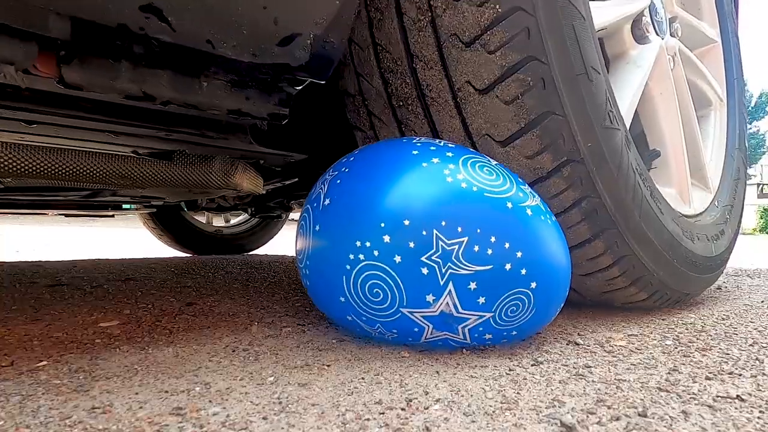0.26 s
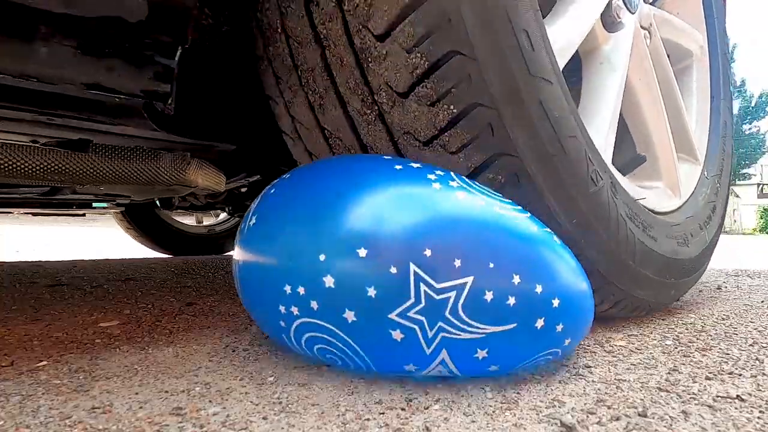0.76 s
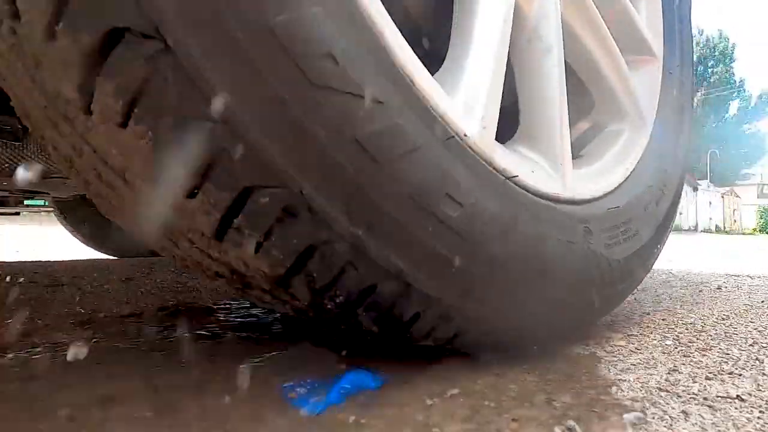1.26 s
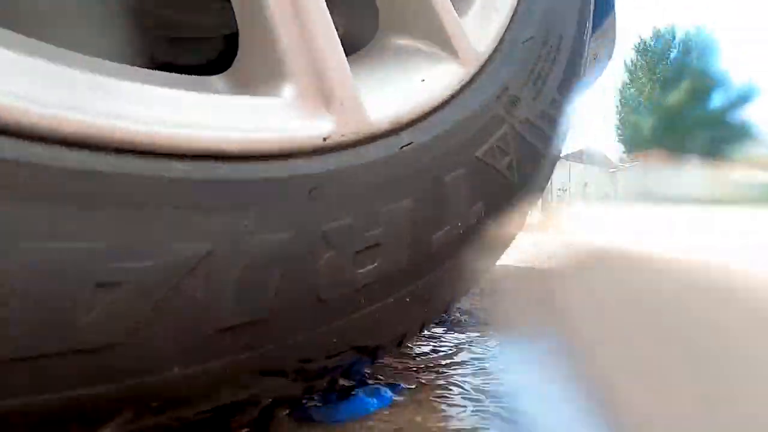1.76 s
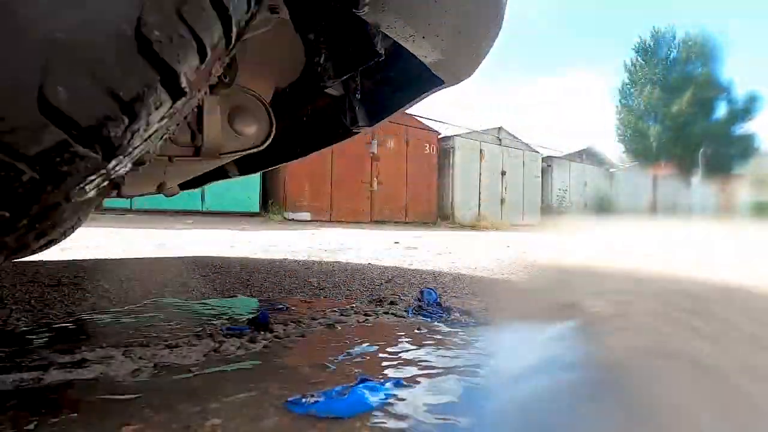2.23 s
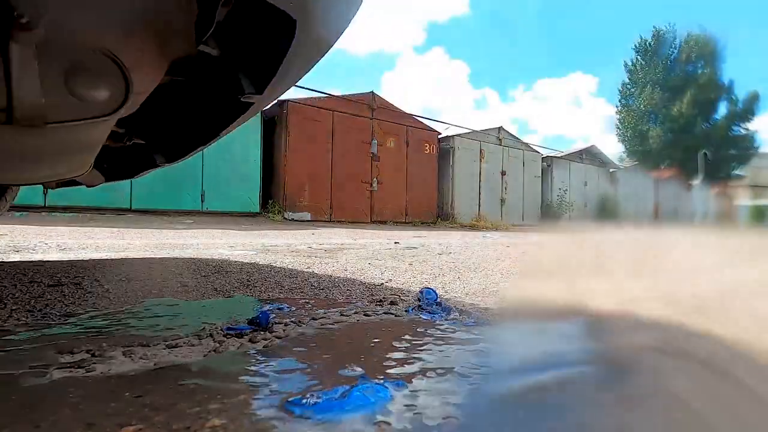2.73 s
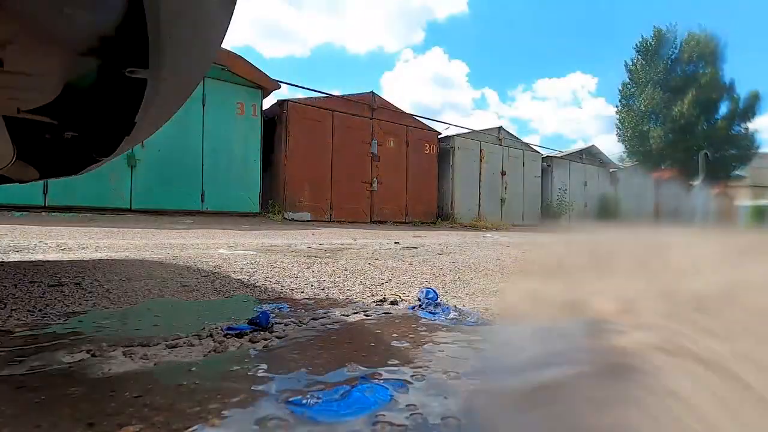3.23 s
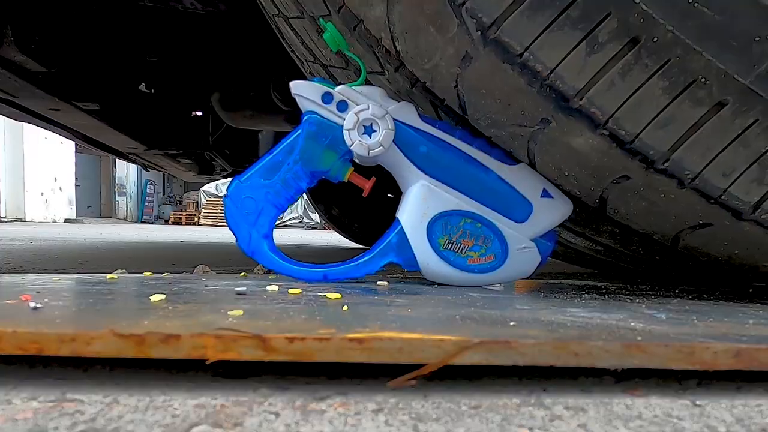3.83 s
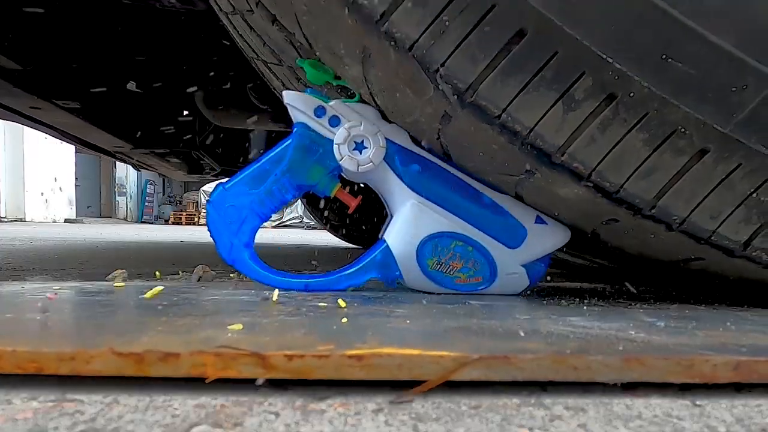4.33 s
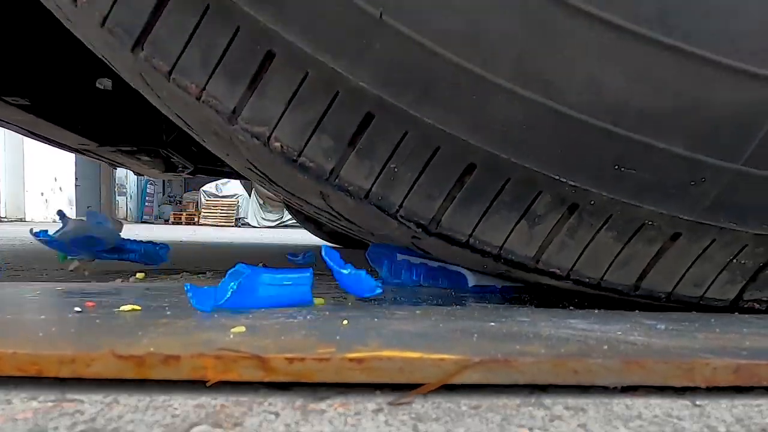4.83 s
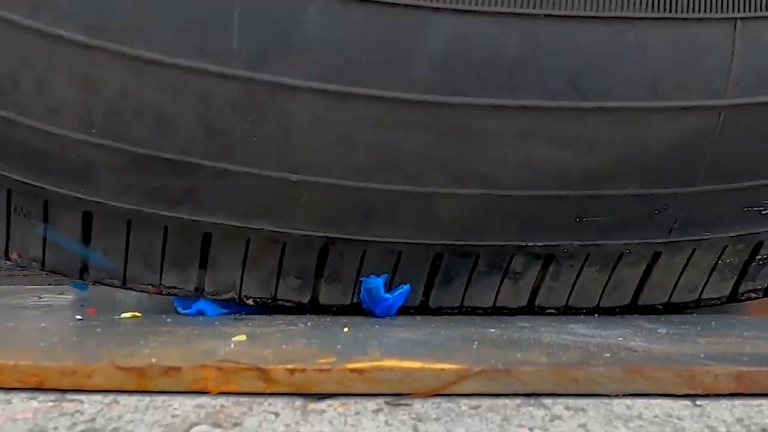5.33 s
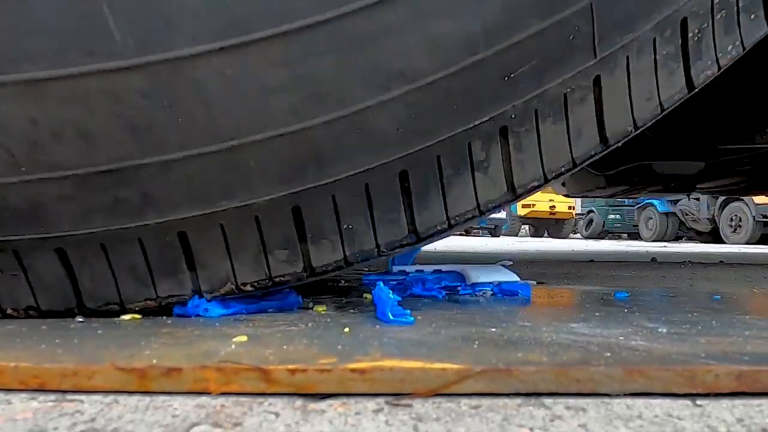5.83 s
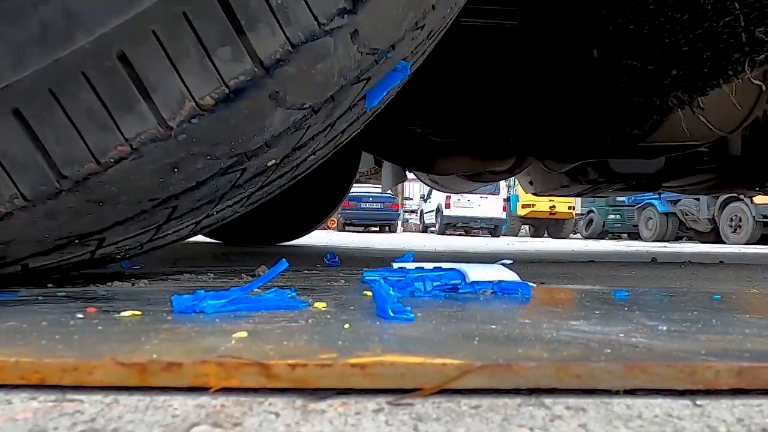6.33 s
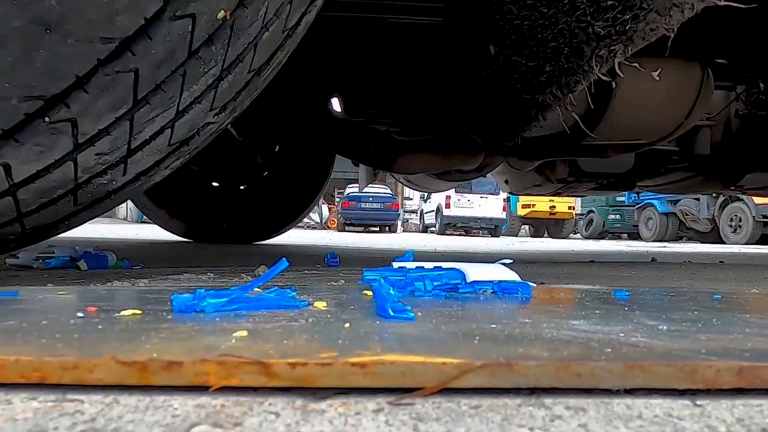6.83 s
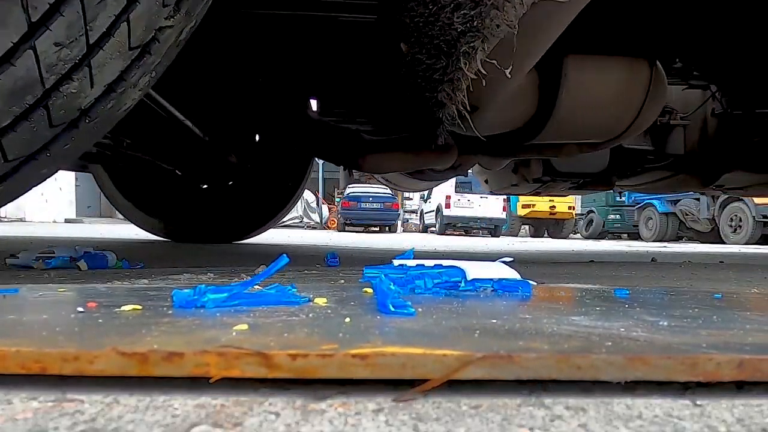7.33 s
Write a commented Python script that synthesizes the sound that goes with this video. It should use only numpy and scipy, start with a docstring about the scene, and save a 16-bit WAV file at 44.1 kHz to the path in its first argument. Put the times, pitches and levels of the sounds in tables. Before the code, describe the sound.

From 0 s a petrol engine idles very close, a low pulsing drone with airy whirr. Around 0.65 s a couple of small wet ticks and a thin trickle begin; at about 1.1 s the water balloon bursts in a gush, a bubbly gulp and hard slaps straight on the microphone. The engine turns quiet and muffled, with another watery thump near 1.48 s, then scattered drops and faint wet tyre ticking. The exhaust swells back from 2.3 to 2.8 s. At 3.57 s a hard cut: a rough diesel clatters, with light ringing chinks. From 4.25 s plastic cracks sharply and densely, with squeaky creaks, hollow ringing and crunching splinters while the engine sags. After 5 s the breaks grow duller and sparser, stopping near 5.55 s. Diesel clatter returns from 5.7 s; a last cluster of cracks comes at 5.96-6.15 s, a grit tick at 6.4 s, then rattling idle with small chinks until 7.6 s.

```python
"""A petrol car idles close beside a ground-level microphone, its exhaust harmonics locked to the firings.
The creeping wheel bursts a water balloon: coloured spray, bubble tones and slaps hit the microphone.
Dulled engine noise and drops follow, then a hard cut to a clattering diesel, noise puffed by each firing.
It rolls over a plastic water pistol: bursts of noise and ringing tones crack it and its hollow body rings,
while splinters crunch, gliding tones creak, and short echoes under the car hollow the sound."""
import sys
import numpy as np
from scipy import signal
from scipy.fft import rfft, irfft, next_fast_len
from scipy.io import wavfile

SR = 44100
rng = np.random.default_rng(int(sys.argv[2]) if len(sys.argv) > 2 else 0)


def unload_wav(signal):
    """Save mono or channel-first audio to the path in sys.argv[1] as 16-bit WAV at rate SR, clipped to [-1, 1]."""
    wavfile.write(
        sys.argv[1],
        SR,
        np.round(np.clip(np.atleast_2d(signal).T, -1, 1) * 32767).astype(np.int16),
    )


N = 334278

CUT_S, EDGE_HZ = 3.567, 15900  # cut between the scenes; upper band limit
T = np.arange(N) / SR

# Petrol engine speed: time_s, firings_per_s
PETROL_SPEED = [(0.0, 29.19), (0.95, 29.6), (1.7, 29.0), (2.3, 29.03), (2.6, 28.77), (2.85, 29.14),
                (3.05, 28.72), (3.3, 28.41), (3.565, 29.48)]
# Exhaust harmonics beside the car and behind it: multiple_of_firing_rate, relative_level_db
PIPE_BESIDE = [(1, 1.5), (2, -4), (3, -3), (4, -18), (5, -10.5), (6, -10), (7, -11), (8, -2), (9, -18.5),
               (10, -21)]
PIPE_BEHIND = [(1, 1), (2, -5.5), (3, -8.5), (4, -23), (5, -16.5), (6, -18), (7, -11.5), (8, -13.5),
               (9, -25.5), (10, -20), (11, -31.5), (12, -27), (13, -23.5), (14, -36.5), (15, -30),
               (16, -33), (17, -26.5), (18, -35)]
# Engine-bay whirr through a dry and a wet microphone: frequency_hz, relative_level_db (per Hz)
WHIRR_DRY = [(20, -2), (100, 8.5), (250, 7.5), (350, -4), (700, -9), (1500, -4.5), (2300, -9), (4000, -14),
             (7000, -21.5), (10000, -34), (16000, -53)]
WHIRR_WET = [(20, 14), (100, 13), (250, 9.5), (480, 4), (650, -0.5), (1000, 1.5), (1500, -5), (2100, -15),
             (3500, -26.5), (6000, -46), (9000, -63.5), (16000, -56)]
# Resonances of the engine bay: frequency_hz, width_hz, lift_db (dry; a share of it when wet)
BAY = [(495, 100, 5), (948, 73, 11.5), (1398, 37, 7), (1676, 36, 7), (2230, 89, 6.5)]
# Petrol level, down once the microphone is wet and up as the tailpipe comes round: time_s, level_db
PETROL_LEVEL = [(0.0, 0), (1.14, 0.5), (1.17, -2), (1.45, -11), (1.75, -12), (2.15, -13.5), (2.8, -2),
                (3.55, 1)]
# Low and high exhaust harmonics, before the level curve and the slight lean to the right
BOOM_DB, DRONE_DRY_DB, DRONE_WET_DB = -26, -32.5, -37.5
DRONE_UNEVEN_DB = 2.5  # plus or minus, from firing to firing once the microphone is wet
DRONE_DROP_S, DRONE_DROP_DB = 0.64, -2.5  # the drone eases as the balloon gives way
# Whirr levels before the level curve, and the share of that curve's dB it follows
WHIRR_DRY_DB, WHIRR_WET_DB, WHIRR_FOLLOWS = -40, -43.5, 0.57
# Each wave smothers the engine for a moment
SMOTHER_DB, SMOTHER_FALL_S, SMOTHER_HOLD_S, SMOTHER_RECOVER_S = -16.5, 0.019, 0.064, 0.17

# Diesel engine speed: time_s, firings_per_s
DIESEL_SPEED = [(3.58, 31.53), (3.9, 34.13), (4.19, 33.66), (4.37, 33.01), (4.93, 29.95), (5.2, 28.31),
                (5.5, 26.92), (5.88, 31.82), (6.33, 28.33), (6.45, 27.24), (6.7, 28.09), (7.58, 27.22)]
# Exhaust harmonics pulling and idling: multiple_of_firing_rate, relative_level_db
PIPE_PULL = [(1, 1), (2, 4), (3, -5.5), (4, -10), (5, -24.5), (6, -19), (7, -12)]
PIPE_IDLE = [(1, -1), (2, 6.5), (3, 0), (4, 0), (5, -7), (6, -29), (7, -9.5), (8, -14.5), (9, -12.5)]
# Clatter ahead of the wheel and under the body: frequency_hz, relative_level_db (per Hz)
CLATTER_AHEAD = [(20, 2.5), (110, 8), (250, 0.5), (550, -1.5), (1100, 0.5), (1500, -5.5), (2100, -6.5),
                 (2500, -12), (3500, -14), (4200, -25), (6500, -33.5), (8500, -42), (12000, -51.5),
                 (16000, -62)]
CLATTER_UNDER = [(20, -10), (110, 8.5), (250, 5), (550, 3), (1000, 1.5), (1500, -1.5), (2100, -5.5),
                 (2600, -9), (3400, -10), (4200, -23), (6500, -34), (8500, -43.5), (12000, -50),
                 (16000, -58)]
# Resonances of the engine block: frequency_hz, width_hz, lift_db
BLOCK = [(940, 78, 0), (1890, 110, 1), (3480, 140, 2), (5380, 1140, 8.5), (7400, 710, 8.5),
         (9450, 800, 7.5)]
# Clatter level before trims, lowest while the tyre stands before the microphone: time_s, level_db
DIESEL_LEVEL = [(3.6, -31.5), (4.2, -31.5), (4.36, -42), (4.8, -50.5), (5.25, -50), (5.57, -52),
                (5.69, -38.5), (6.2, -40.5), (6.5, -36.5), (7.55, -35)]
# Exhaust levels before the clatter curve, and the share of that curve's dB they follow
PULL_DB, IDLE_DB, PIPE_FOLLOWS = -12, -10, 0.58
LIMP_DB = 2.5  # alternate firings: their spread in the idle clatter, plus or minus in the rattle
# Loose underbody parts that buzz with the firings: frequency_hz, width_hz, level_db (before clatter curve)
RATTLES = [(1110, 540, -7), (2016, 420, -12.5), (3435, 220, -21)]
# Loose parts left ringing: start_s, level_db, pitch_hz
CHINKS = [(3.612, -23, 1974), (3.706, -28, 3540), (3.793, -23, 2000), (3.889, -31, 3640),
          (3.971, -24, 2000), (4.063, -29, 3650), (4.149, -23, 1980), (6.641, -29, 3410), (6.78, -35, 3420),
          (6.855, -27.5, 3380), (6.926, -41, 3480), (7.07, -33, 3520), (7.288, -33, 3450),
          (7.365, -33, 3450), (7.40, -33, 3430), (7.437, -45, 3420), (7.51, -29.5, 3450)]
CHINK_RISE_S, CHINK_RING_S = 0.0046, 0.049  # rise and t60
# Echoes between the ground and the floor of the car: delay_s, level_db
ECHOES = [(.0023, -25), (.0041, -20), (.0067, -19), (.0098, -16), (0.0147, -17.5)]

# Tyre rumble: frequency_hz, relative_level_db (per Hz)
RUMBLE_COLOUR = [(15, -26), (38, 4), (130, 0.5), (200, -5.5), (320, -15.5), (600, -20.5), (1200, -28),
                 (4000, -71)]
# Splinters under the tread: frequency_hz, relative_level_db (per Hz)
CRUNCH_COLOUR = [(590, -41), (1000, 9), (1740, 1), (1950, -2), (3210, 2.5), (4260, -2), (4720, 2),
                 (6410, -3.5), (9210, -5.5), (15000, -25)]
# How hard the tyre grinds the splinters: time_s, crunch_level_db
GRINDING = [(4.22, -44.5), (4.4, -49), (4.75, -46), (4.95, -45), (5.13, -49.5), (5.27, -53), (5.32, -58),
            (5.4, -51.5), (5.53, -52.5), (5.57, -62), (5.62, -69), (5.92, -58), (6.01, -45), (6.07, -53),
            (6.12, -52), (6.2, -62)]
RUMBLE_DB, RUMBLE_FOLLOWS = -17.5, 0.36  # level before, and share of, the grinding curve's dB
# The engine and tyre sound sinks briefly after a crack, by a share of its thud_db above a threshold
DIP_ABOVE_DB, DIP_SHARE, DIP_FALL_S, DIP_HOLD_S, DIP_RECOVER_S = -34.5, 0.28, 0.025, 0.017, 0.059

# Rushing water: frequency_hz, relative_level_db (per Hz)
RUSH_COLOUR = [(240, -30), (400, -6), (780, -9), (949, -2.5), (1390, -5), (3830, -9), (7240, -20.5),
               (9810, -20.5), (15000, -38)]
# Water running out in gushes: start_s, end_s, first_level_db, last_level_db
GUSHES = [(0.62, 1.12, -45.5, -42), (0.88, 1.11, -53, -30), (1.111, 1.121, -32, -28.5),
          (1.1386, 1.138, -22, -28), (1.17, 1.474, -73.5, -48.5)]
GUSH_RELEASE_DB_PER_S = 1097  # fall after the end of a gush
# Waves over the microphone: start_s, end_s, level_db, bubble_hz, bubble_level_db (before its left lean)
WAVES = [(1.101, 1.147, -20, 930, -17), (1.456, 1.487, -31.5, 900, -21)]
SETTLE_DB, SETTLE_S = -19.5, 0.31  # low tail of a wave: level relative to the wave, t60
SLOSH_DB, SLOSH_S = -7, 0.048  # dull slosh after a wave: level relative to the wave, t60
# Water slapping the microphone: start_s, level_db, pitch_hz, t60_s, left_minus_right_db
SLAPS = [(1.1420, -2, 586, 0.0088, 5.5), (1.1435, -13.5, 360, 0.011, -2), (1.148, -26, 200, 0.03, 2),
         (1.274, -46, 1550, 0.024, 0), (1.284, -43, 1360, .022, 0), (1.4620, -27.5, 140, 0.081, -20),
         (1.4772, -23.5, 139, 0.036, -17), (1.4827, -21, 136, 0.061, 17), (1.482, -6.5, 650, 0.008, -12.5),
         (1.4832, -11, 1520, 0.0059, 11.5), (1.648, -40.5, 550, 0.01, -2), (1.781, -27, 850, 0.016, -4.5),
         (1.784, -29.5, 595, 0.023, -1), (3.520, -24.5, 1043, 0.01, -0.5)]
# Drops landing: start_s, level_db, pitch_hz, blip_db (relative to level_db)
DROPS = [(0.6625, -26.5, 3230, -1), (0.698, -25, 900, -12), (1.144, -18.5, 2300, -20),
         (1.284, -46, 1400, -8), (1.335, -37, 1520, -20), (1.352, -36.5, 2800, -9), (1.403, -39, 2160, -6),
         (1.4309, -27, 1890, -17), (1.471, -30, 1620, 0), (1.481, -26, 1650, -19), (1.648, -59, 2300, -7),
         (1.781, -46, 3930, -17), (1.799, -47, 4500, -11), (2.0084, -46, 3170, -5), (2.019, -45, 2400, -6),
         (2.0285, -46, 3080, -13), (2.038, -58, 4000, -6), (2.154, -49.5, 3250, -2.5),
         (2.232, -54, 2500, -5), (2.43, -59, 2500, -10), (2.65, -56, 2500, -10), (2.757, -54, 2580, -5),
         (2.819, -44, 1880, -5), (3.332, -50, 2300, -10)]
# Stray drips from the wet tyre as it rolls away
DRIPS_FROM_S, DRIPS_TO_S, DRIP_DB, DRIP_SPREAD_DB = 1.6, 3.5, -65, 3
DRIP_LOW_HZ, DRIP_HIGH_HZ = 1700, 3600

# Creaks and squeaks, with the pistol's hollow shell singing near 1.8 kHz:
# start_s, end_s, start_pitch_hz, end_pitch_hz, level_db
CREAKS = [(4.203, 4.238, 1160, 1130, -41), (4.274, 4.33, 1795, 1750, -52), (4.416, 4.438, 1165, 1085, -38),
          (4.466, 4.508, 1680, 1760, -41.5), (4.562, 4.594, 1030, 920, -42.5),
          (4.568, 4.62, 1805, 1765, -43), (4.646, 4.671, 1480, 1753, -39), (4.675, 4.712, 1790, 1770, -49),
          (4.699, 4.744, 1805, 1810, -39.5), (4.701, 4.717, 4480, 4890, -40),
          (4.737, 4.763, 4000, 4900, -41), (4.777, 4.805, 1455, 1380, -44), (5.205, 5.272, 4130, 4480, -48),
          (5.273, 5.29, 4460, 4530, -39), (5.388, 5.402, 1250, 1350, -54), (5.431, 5.44, 1260, 1360, -46),
          (5.53, 5.544, 268, 219, -35)]
CREAK_BEND, CREAK_BENDS_PER_S = 0.0084, 60  # rms pitch ratio; it bends as the load shifts
CREAK_UNEVEN_DB, CREAK_PURE = 5.5, .55  # catching and letting go; share of steady squeal
# Plastic cracking: start_s, level_db, pitch_hz, thud_db (raised 4 dB later), snap_db, tear_t60_s
CRACKS = [(4.2456, -16, 3080, -23, -24, 0.012), (4.259, -25, 4070, -43, -36, 0.012),
          (4.288, -19, 2760, -29, -31, 0.016), (4.3025, -19, 3500, -26.5, -26.5, 0.014),
          (4.341, -20.5, 2590, -22, -28, 0.022), (4.3533, -27, 2800, -38, -44, 0.015),
          (4.389, -26, 3440, -33, -42, 0.013), (4.394, -19, 2500, -31, -31, 0.019),
          (4.405, -31, 2870, -49, -42, 0.013), (4.432, -23, 2850, -39, -31, 0.024),
          (4.4533, -24, 2580, -29.5, -31.5, 0.041), (4.4765, -26, 4730, -36, -43, 0.035),
          (4.498, -23, 1650, -29, -27.5, 0.025), (4.5033, -18.5, 2930, -31, -31, 0.019),
          (4.5326, -22, 2620, -26.5, -25, 0.02), (4.5365, -24, 1760, -34, -34, 0.026),
          (4.5836, -36, 4500, -30, -39, .02), (4.595, -20.5, 4010, -38, -28, 0.023),
          (4.6199, -38, 2700, -49, -31, 0.017), (4.6487, -27, 1820, -42, -39, .024),
          (4.6612, -22, 1690, -38, -27.5, 0.022), (4.6808, -26, 1810, -35, -35, 0.027),
          (4.7062, -24, 4600, -32.5, -38, 0.037), (4.7116, -23.5, 3300, -40, -34, 0.023),
          (4.743, -28, 3940, -38, -36, 0.029), (4.755, -25.5, 4630, -38, -39, 0.074),
          (4.764, -34, 2720, -52, -38, 0.02), (4.783, -25.5, 3000, -37, -26.5, 0.039),
          (4.794, -21, 3200, -30.5, -29, 0.021), (4.8, -27.5, 3160, -50, -32, 0.078),
          (4.86, -27, 3820, -50, -34, 0.012), (4.8703, -31, 2900, -45, -42, 0.012),
          (4.881, -26.5, 3080, -42, -31, 0.029), (4.901, -23, 3100, -34, -27.5, 0.018),
          (4.911, -25, 2440, -35, -32, 0.024), (4.9474, -20.5, 3000, -33, -31, 0.016),
          (4.9626, -25, 2370, -31.5, -29, 0.018), (4.996, -26, 3540, -30, -34, .009),
          (5.006, -25, 2200, -33, -26, 0.018), (5.041, -37, 3020, -41, -42, 0.0091),
          (5.0572, -22, 3700, -35, -30, 0.021), (5.0754, -27.5, 1620, -40, -36, 0.02),
          (5.0948, -24, 4410, -31.5, -32, 0.021), (5.11, -22, 3000, -36, -42, 0.021),
          (5.1182, -13, 2060, -23.5, -30, 0.008), (5.136, -40, 3380, -48, -55, .012),
          (5.1465, -37, 3800, -50, -50, .006), (5.1583, -24.5, 3330, -27.5, -46, 0.02),
          (5.189, -27, 3870, -40, -48, 0.011), (5.2005, -24.5, 4000, -28, -45, 0.0075),
          (5.22, -34, 3900, -50, -54, .012), (5.2282, -26, 3570, -45, -50, 0.018),
          (5.2427, -34, 4100, -44, -48, .009), (5.252, -31, 2500, -48, -52, .008),
          (5.2655, -27, 3570, -43, -50, 0.015), (5.256, -26, 3930, -38, -47, 0.0085),
          (5.2806, -28, 3780, -32, -46, 0.0043), (5.2842, -15.5, 3250, -20, -40, 0.011),
          (5.3267, -32, 2350, -42, -51, 0.0054), (5.3594, -19.5, 4570, -35, -31, 0.01),
          (5.3664, -28, 3910, -39, -33, 0.0086), (5.3935, -41, 1630, -31, -42, 0.011),
          (5.4117, -31, 5570, -50, -44, .006), (5.431, -19.5, 5760, -38, -38, 0.0066),
          (5.435, -23, 5640, -35, -40, 0.0061), (5.4706, -17.5, 3090, -35.5, -24.5, 0.0096),
          (5.4953, -22, 3020, -38, -25, 0.0068), (5.533, -16.5, 2370, -26, -29, 0.0067),
          (5.5436, -18.5, 2430, -33, -37, 0.0055), (5.963, -33, 2670, -36, -35, .02),
          (5.979, -24, 2970, -33, -35, 0.015), (6.0005, -19, 3670, -30, -43, 0.011),
          (6.029, -23.5, 1930, -27, -46, 0.028), (6.0976, -31, 3440, -32, -49, .024),
          (6.1136, -22.5, 3770, -28.5, -44, 0.012), (6.1535, -16, 2050, -25, -53, 0.0075)]
# Small pieces break at random between the big cracks; thud and snap are relative to the chip
CHIPS_FROM_S, CHIPS_TO_S, CHIP_DB, CHIP_SPREAD_DB = 4.45, 5.13, -31, 2
CHIP_LOW_HZ, CHIP_HIGH_HZ, CHIP_THUD_DB, CHIP_SNAP_DB, CHIP_TEAR_S = 1900, 4680, -18, -24, 0.032
SHELL_DB, SHELL_RING_S = -27, 0.041  # partials of each broken piece: level relative to the crack, t60
STRAIN_DB, STRAIN_S = -18.5, 0.028  # tiny fractures before a break: level relative to the crack, t60
# Hollow body of the pistol set ringing by the cracks: pitch_hz, level_db, t60_s
BODY = [(1124, -48, 0.17), (1746, -49, 0.18), (2720, -72, 0.07), (4570, -71, 0.046)]
# The tread closes over the pieces: they break duller and with less ring
COVER_S, COVER_FADE_S = 4.97, 0.19
# Loose pieces ringing as they spring free: start_s, level_db, pitch_hz, t60_s
SHARDS = [(4.2471, -19, 1085, 0.044), (4.247, -32, 1770, 0.17), (4.393, -27, 1104, 0.043),
          (4.5366, -33.5, 1800, .14), (5.2, -34, 4270, 0.037), (5.963, -32, 2620, 0.048),
          (5.963, -32.5, 4750, 0.033), (5.978, -33, 2630, 0.058), (6.001, -32, 3460, 0.046),
          (6.001, -31, 5400, 0.032), (6.017, -38, 3420, 0.074)]
# Grit ticking in the tread: start_s, level_db, pitch_hz
GRIT = [(5.773, -33, 4200), (5.885, -28.5, 4430), (6.017, -26, 5000), (6.059, -28.5, 5130),
        (6.105, -36, 5200), (6.137, -34, 5200), (6.394, -21.5, 2810), (6.741, -30, 9200),
        (6.764, -31, 8800)]

# Likeness of the left and right channels: frequency_hz, likeness (0-1)
SAME_PETROL = [(100, 0.9), (260, 1), (600, 0.75), (2000, 0.37), (5000, 0.14), (12000, 0.06)]
SAME_RUMBLE = [(40, 1), (800, 1)]
SAME_WET = [(100, 1), (1000, 1), (3000, 1), (9000, 0.64)]
SAME_DIESEL = [(100, 1), (2000, 1), (3500, .995), (6000, 0.95), (12000, 0.87)]
# Added left-right difference over time: time_s, side_level_db
WIDTH = [(1.0, -33), (1.2, -14), (1.42, -6.5), (1.55, -2), (1.8, -4), (2.05, -39), (2.4, -60),
         (3.55, -58.5), (3.58, -13.5), (4.15, -13.5), (4.27, -7), (4.55, -14), (4.8, -25.5), (5.1, -30),
         (5.3, -60)]
WIDTH_BASS_DB, WIDTH_BASS_HZ = -4, 400  # the bass is narrower


def amp(db):
    """Decibels to gain."""
    return 10 ** (np.asarray(db) / 20)


def evened(x):
    """Scales to rms 1."""
    return x / np.sqrt(np.mean(x ** 2) + 1e-20)


def read(points, hz):
    """Reads a spectrum table on a log-frequency axis."""
    f, value = np.transpose(points)
    return np.interp(np.log(hz + 1), np.log(f + 1), value)


def curves(rows):
    """Reads each column of a time table at every sample."""
    s, *columns = np.transpose(rows)
    return [np.interp(T, s, c) for c in columns]


def after(s, fade):
    """Rises from 0 to 1 around time s."""
    return np.clip((T - s) / fade + .5, 0, 1)


def dip(s, fall, hold, recover):
    """Goes from 0 to 1 after time s, stays, and returns."""
    return np.clip(np.minimum((T - s) / fall, 1 - (T - s - fall - hold) / recover), 0, 1)


def add(mix, s, sound):
    """Adds a sound to the mix at time s."""
    part = mix[:, round(s * SR):][:, :sound.shape[-1]]
    part += sound[..., :part.shape[1]]


def ringing(t, hz, db, t60):
    """A struck tone: a sine that dies by 60 dB in t60."""
    return amp(db - 60 * t / t60) * np.sin(2 * np.pi * hz * t)


def band(x, lo_hz, hi_hz, order=2):
    """Causal band-pass."""
    edges = [min(lo_hz, SR * .4), min(hi_hz, SR * .45)]
    return signal.sosfilt(signal.butter(order, edges, "band", fs=SR, output="sos"), x)


def colour(pair, points, same, resonances=()):
    """Gives two unrelated excitations a spectrum, resonances and a left-right likeness."""
    size = next_fast_len(N)
    hz, (mid, side) = np.fft.rfftfreq(size, 1 / SR), rfft(pair, size)
    lifts = sum(lift / (1 + (2 * (hz - f) / width) ** 2) for f, width, lift in resonances)
    db = read(points, hz) + lifts
    likeness = np.clip(read(same, hz), 0, 1)
    mid, side = mid * np.sqrt(1 + likeness), side * np.sqrt(1 - likeness)
    return evened(irfft(np.array([mid + side, mid - side]) * amp(db), size)[:, :N])


def white():
    """Two channels of white noise."""
    return rng.standard_normal((2, N))


def wander(per_s):
    """Slow chance of rms 1, joining random knots by straight lines."""
    knots = rng.standard_normal(2000)
    return evened(np.interp(T * per_s, np.arange(len(knots)), knots))


def grains(per_s, spread_db):
    """Sparse clicks of either sign, their sizes spread in decibels."""
    out = np.zeros((2, N))
    place, size, sign = rng.random((100000, 3))[:round(2 * per_s * N / SR)].T
    strength = amp(spread_db * np.minimum(-np.log(1 - size), 4))
    out.flat[(place * 2 * N).astype(int)] = np.sign(sign - .5) * strength
    return evened(out)


def ticks(per_s, spread_db, lo_hz, hi_hz, width, count=14):
    """Sparse small fractures, each ringing briefly in one of several narrow bands."""
    bands = (evened(band(grains(per_s / count, spread_db), hz, hz * (1 + width), order=1))
             for hz in np.geomspace(lo_hz, hi_hz, count))
    return evened(sum(bands))


def burst(t60, lo_hz, hi_hz, apart=0.018):
    """A tear: one clean break and a dying run of tiny ones, in one band, peak about 1."""
    t, t60 = np.arange(3000) / SR, max(t60, .001)
    breaks = rng.standard_normal((2, len(t)))
    mid, side = breaks * abs(breaks) ** .5 * amp(-60 * t / t60)
    mid[10] += 8  # the clean break
    x = band(np.array([mid + apart * side, mid - apart * side]), lo_hz, hi_hz)
    return x / (3 * np.sqrt(np.sum(x ** 2) / (.5 * t60 * SR)))


def turning(speed, firing_s):
    """Counts firings by summing the engine speed; one falls at firing_s."""
    turns = np.cumsum(curves(speed)[0]) / SR
    return turns - np.interp(firing_s, T, turns)


def exhaust(turns, orders, smear=0, focus=0):
    """Harmonics of a pressure dip, sharp at each firing; a long silencer smears it, a near tailpipe focuses it."""
    k, db = np.transpose(orders)
    log_gain = np.log(amp(db))
    # the phase that goes with these levels when the pulse starts sharply
    mirrored = np.r_[log_gain[0], log_gain, log_gain[-2::-1]]
    lag = signal.hilbert(mirrored).imag[1:len(k) + 1] + smear * (k - 1) ** 2
    lag = lag + focus * (k > 4) * (2 * np.pi * k * .035 - lag)
    phase = 2 * np.pi * k[:, None] * (turns % 1) - lag[:, None]
    return -amp(db)[:, None] * np.cos(phase.astype("float32"))


def puffs(turns, depth, decay, uneven_db, limp_db=0):
    """Noise that swells at each firing by an uneven amount; even firings may be stronger than odd ones."""
    firing = np.floor(turns).astype(int)
    strength = amp(uneven_db * rng.uniform(-1, 1, 400))[firing % 400]
    strength = strength * amp(limp_db * np.cos(np.pi * firing))
    return white() * (1 + depth * strength * np.exp(-(turns % 1) / decay))


def underbody(x):
    """Adds the short echoes under the car, which hollow out everything above the bass."""
    out, bright = x.copy(), band(x, 480, 9900, order=1)
    for delay, db in ECHOES:
        add(out, delay, amp(db) * bright)
    return out


def petrol():
    """Idling exhaust and engine-bay whirr; waves smother them, and the tailpipe comes round as the car passes."""
    level_db = curves(PETROL_LEVEL)[0]
    smothered = sum(dip(end, SMOTHER_FALL_S, SMOTHER_HOLD_S, SMOTHER_RECOVER_S) for _, end, *_ in WAVES)
    turns = turning(PETROL_SPEED, firing_s=.119)
    behind, wet = after(2.33, 0.64), after(1.15, .01)
    drone_dry_db = DRONE_DRY_DB + DRONE_DROP_DB * after(DRONE_DROP_S, .03)
    drone_db = (1 - wet) * drone_dry_db + wet * DRONE_WET_DB
    uneven_db = DRONE_UNEVEN_DB * rng.uniform(-1, 1, 400)[np.round(turns).astype(int) % 400]
    pipe = 0
    for orders, share, focus in (PIPE_BESIDE, 1 - behind, 0), (PIPE_BEHIND, behind, 1):
        harmonics = exhaust(turns, orders, focus=focus)
        boom, drone = evened(harmonics[:4].sum(0)), evened(harmonics[4:].sum(0))
        pipe = pipe + share * (amp(BOOM_DB) * boom + amp(drone_db + uneven_db * wet) * drone)
    dry_puffs = puffs(turns, depth=0.62, decay=0.27, uneven_db=5.0)
    dry = colour(dry_puffs, WHIRR_DRY, SAME_PETROL, BAY) * amp([[6], [0]])  # left is 6 dB louder
    wet_bay = [(f, width, 0.31 * lift) for f, width, lift in BAY]
    wet_puffs = puffs(turns, depth=0.46, decay=0.36, uneven_db=11.0)
    muffled = colour(wet_puffs, WHIRR_WET, SAME_WET, wet_bay)
    whirr = (1 - wet) * amp(WHIRR_DRY_DB) * dry + wet * amp(WHIRR_WET_DB) * muffled
    lean = amp((-0.5 - wet) * np.array([[.7], [-.7]]))  # the exhaust is a little to the right
    engine = amp(level_db) * lean * pipe + amp(WHIRR_FOLLOWS * level_db) * whirr
    return amp(SMOTHER_DB * smothered) * engine


def rattle(turns):
    """Each loose part is shaken by every firing, unevenly, and buzzes in its own band."""
    out = 0
    for hz, width, db in RATTLES:
        shake = puffs(turns - .02, depth=5.7, decay=0.32, uneven_db=7.5, limp_db=LIMP_DB)[0]
        out = out + amp(db) * evened(band(shake, hz - width / 2, hz + width / 2))
    return out


def diesel():
    """Exhaust pulses, and combustion knock ringing in the block; the engine sags as the wheel climbs."""
    level_db = curves(DIESEL_LEVEL)[0]
    turns, idle = turning(DIESEL_SPEED, firing_s=6.996), after(5.68, 0.91)
    pulling_pipe = evened(exhaust(turns + 0.209, PIPE_PULL, smear=0.262).sum(0))
    idling_pipe = evened(exhaust(turns, PIPE_IDLE).sum(0))
    pipe = (1 - idle) * amp(PULL_DB) * pulling_pipe + idle * amp(IDLE_DB) * idling_pipe
    ahead_puffs = puffs(turns + .3, depth=0.67, decay=0.35, uneven_db=9)
    ahead = colour(ahead_puffs, CLATTER_AHEAD, SAME_DIESEL, BLOCK)
    under_puffs = puffs(turns + .01, depth=1.05, decay=0.43, uneven_db=2, limp_db=LIMP_DB / 2)
    under = colour(under_puffs, CLATTER_UNDER, SAME_DIESEL, BLOCK)
    clatter = np.sqrt(1 - idle) * amp(1.5) * ahead + np.sqrt(idle) * amp(3.0) * under + rattle(turns)
    pipe_gain = amp(PIPE_FOLLOWS * level_db + 0.52 * wander(30))
    return pipe_gain * pipe + amp(level_db - 0.6) * underbody(clatter)


def chinks():
    """A loose part rings on two close pitches, rising briefly and dying away."""
    out, t = np.zeros((2, N)), np.arange(SR // 8) / SR
    for (s, db, hz), split in zip(CHINKS, rng.uniform(-0.079, 0.076, len(CHINKS))):
        ring = np.sin(2 * np.pi * hz * t) + 0.62 * np.sin(2 * np.pi * hz * (1 + split) * t)
        add(out, s, ring * np.minimum(t / CHINK_RISE_S, 1) * amp(db - 60 * t / CHINK_RING_S))
    return out


def wet_tyre():
    """The wet tread ticks faintly as it rolls away."""
    patter = ticks(per_s=260, spread_db=-3, lo_hz=1300, hi_hz=5200, width=.5, count=5)
    fading = after(1.596, 0.096) * (1 - 0.58 * after(2.06, 0.37))
    return amp(-74.0) * band(patter[0], 900, 5160) * fading


def grinding():
    """Splinters crunch under the tread as fine fractures, and the tyre rumbles over them."""
    grind_db = curves(GRINDING)[0]
    splinters = ticks(per_s=900, spread_db=1.5, lo_hz=1395, hi_hz=10140, width=0.071, count=20)
    splinters = splinters + 0.85 * grains(per_s=1200, spread_db=2.0)
    crunch = underbody(colour(splinters, CRUNCH_COLOUR, SAME_DIESEL)) * amp(grind_db + 2.1 * wander(90))
    rumble = colour(white(), RUMBLE_COLOUR, SAME_RUMBLE) * amp(RUMBLE_DB + RUMBLE_FOLLOWS * grind_db)
    return after(4.24, 0.055) * (1 - after(6.2, 0.055)) * (crunch + rumble)


def crack_dips():
    """The level sinks briefly after each heavy crack."""
    depth_db = np.zeros(N)
    for s, _, _, thud_db, *_ in CRACKS:
        if thud_db > DIP_ABOVE_DB:
            sink = dip(s, DIP_FALL_S, DIP_HOLD_S, DIP_RECOVER_S)
            depth_db = np.maximum(depth_db, DIP_SHARE * (thud_db - DIP_ABOVE_DB) * sink)
    return amp(-depth_db)


def slosh():
    """Water settling over the microphone: a short dull splash and a longer low tail."""
    t = np.arange(SR // 4) / SR
    splash, settle = rng.standard_normal((2, len(t)))
    return (evened(band(splash, 130, 800, order=4)) * amp(SLOSH_DB - 60 * t / SLOSH_S)
            + evened(band(settle, 120, 330, order=4)) * amp(SETTLE_DB - 60 * t / SETTLE_S))


def drop(db, hz, blip_db=-10):
    """A drop landing: a small dulled splat and a short blip."""
    t = np.arange(3000) / SR
    splat = band(burst(0.0083, hz / 1.4, hz * 1.88, apart=.3), 500, 5800, order=3)
    return amp(db) * (splat + ringing(t, hz, blip_db, 0.018))


def drips(count=7):
    """Faint drops at random moments and pitches: start_s, level_db, pitch_hz."""
    when, size, pitch = rng.random((count, 3)).T
    s = DRIPS_FROM_S + when * (DRIPS_TO_S - DRIPS_FROM_S)
    db = DRIP_DB + DRIP_SPREAD_DB * (2 * size - 1)
    hz = DRIP_LOW_HZ * (DRIP_HIGH_HZ / DRIP_LOW_HZ) ** pitch
    return list(zip(s, db, hz))


def water():
    """Gushes of fine spray, waves that trap a bubble and slap the microphone, and drops."""
    spray = colour(grains(per_s=7000, spread_db=4.5) + .5 * white(), RUSH_COLOUR, SAME_PETROL)
    flow = 0
    for start, end, first_db, last_db in GUSHES:
        gush_db = np.interp(T, [start, end], [first_db, last_db])
        release_db = GUSH_RELEASE_DB_PER_S * np.maximum(T - end, 0)
        flow = flow + amp(gush_db - release_db) * after(start, 0.0048)
    out = spray * flow * (1 - after(1.489, 0.0098))
    for start, end, db, bubble_hz, bubble_db in WAVES:
        t = np.arange(start, end, 1 / SR)
        swell = np.linspace(0, 1, len(t)) * signal.windows.tukey(len(t), .2)
        wash = evened(band(rng.standard_normal(len(t)), 90, 600))
        bubble = np.sin(2 * np.pi * bubble_hz * t) * swell ** 2
        add(out, start, amp(db) * swell * wash + amp(bubble_db) * bubble * amp([[3], [-8]]))
        add(out, end, amp(db) * slosh())
    t = np.arange(4096) / SR
    for s, db, hz, t60, pan_db in SLAPS:
        add(out, s, ringing(t, hz, db, t60) * amp([[pan_db / 2], [-pan_db / 2]]))
    for s, *landing in DROPS + drips():
        add(out, s, drop(*landing))
    return out


def clogged(pair):
    """Water fills the left microphone port and dulls it until it drains."""
    left, right = pair
    dull = signal.sosfiltfilt(signal.butter(1, 1700, fs=SR, output="sos"), left)
    filled = after(1.49, 0.02) * (1 - after(2.52, 0.98))
    return np.array([left + filled * (dull - left), right])


def creaks():
    """Gliding, bending tones: a steady squeal mixed with a resonance driven by uneven slips."""
    out = np.zeros((2, N))
    bend = 1 + CREAK_BEND * wander(CREAK_BENDS_PER_S)
    grip = amp(CREAK_UNEVEN_DB * wander(110))
    for start, end, from_hz, to_hz, db in CREAKS:
        size, first = round((end - start) * SR), round(start * SR)
        slips = (rng.random(SR) < 900 / SR) * rng.uniform(0.18, 1, SR)
        pitch_hz = np.linspace(from_hz, to_hz, size) * bend[first:][:size]
        turn = np.exp(2j * np.pi * np.cumsum(pitch_hz) / SR)
        r = np.exp(-np.pi * .035 * from_hz / SR)  # the resonance is 3.5 % of the pitch wide
        # the resonator works in a frame that turns with the gliding pitch
        ring = (turn * signal.lfilter([1 - r], [1, -r], slips[:size] / turn)).real
        ring = band(ring, from_hz / 1.44, from_hz * 1.4)
        ring = CREAK_PURE * evened(turn.imag) + (1 - CREAK_PURE) * evened(ring)
        add(out, start, amp(db) * evened(ring * grip[first:][:size]) * signal.windows.tukey(size, .3))
    return out


def shell(hz, t, count=4):
    """The partials of one piece of plastic, scattered round its main pitch."""
    ratio, phase = rng.random((2, count, 1))
    partials = np.sin(2 * np.pi * (hz * 0.73 * 1.7 ** ratio * t + phase)).sum(0) / np.sqrt(count)
    return partials * np.minimum(t / 0.0018, 1) * amp(-60 * t / SHELL_RING_S)


def strain(db, hz):
    """A short rising run of tiny fractures that ends at the break: a tear played backwards."""
    return amp(db + STRAIN_DB) * burst(STRAIN_S, hz / 1.7, hz * 2.0)[:, ::-1]


def crack(db, hz, thud_db, snap_db, t60):
    """One break: a tear, a ring at its pitch, the shell's partials, a thud and a bright snap."""
    t = np.arange(3000) / SR
    return [amp(db) * burst(t60, hz / 1.41, hz * 1.34),
            ringing(t, hz, db - 7.0, t60 * 1.3),
            amp(db + SHELL_DB) * shell(hz, t),
            amp(thud_db + 4.0) * burst(t60 * 1.63, 135, 1260, apart=0.0042),
            amp(snap_db) * band(burst(t60 * 1.3, 4900, 9160, apart=0.43), 5300, 25000)]


def chips(count=26):
    """Small cracks at random moments and pitches, with the same columns as the big ones."""
    when, size, pitch = rng.random((count, 3)).T
    db = CHIP_DB + CHIP_SPREAD_DB * (2 * size - 1)
    s = CHIPS_FROM_S + when * (CHIPS_TO_S - CHIPS_FROM_S)
    hz = CHIP_LOW_HZ * (CHIP_HIGH_HZ / CHIP_LOW_HZ) ** pitch
    return list(zip(s, db, hz, db + CHIP_THUD_DB, db + CHIP_SNAP_DB, np.full(count, CHIP_TEAR_S)))


def toy():
    """The pistol cracks and its hollow body rings, duller once under the tread; shards ring and grit ticks."""
    out, t = np.zeros((2, N)), np.arange(SR // 4) / SR
    covered = after(COVER_S, COVER_FADE_S)
    for s, db, hz, thud_db, snap_db, t60 in CRACKS + chips():
        for part in crack(db, hz, thud_db, snap_db, t60):
            add(out, s, part)
        run_up = strain(db, hz)
        add(out, s - run_up.shape[1] / SR, run_up)
    body_ring = sum(ringing(t, hz, db, t60) for hz, db, t60 in BODY)
    out += signal.oaconvolve(out * (1 - covered), body_ring[None], axes=1)[:, :N]
    out += 0.4 * (1 - covered) * (underbody(out) - out)
    out += covered * (band(out, 60, 9200, order=3) - out)
    for s, db, hz, t60 in SHARDS:
        add(out, s, ringing(t, hz, db, t60))
    for s, db, hz in GRIT:
        add(out, s, amp(db) * burst(0.012, hz / 1.74, hz * 1.04))
    return out


def widened(pair, size):
    """A phase-scattered copy, added left and subtracted right, makes the two channels differ."""
    hz = np.fft.rfftfreq(size, 1 / SR)
    narrow_bass = amp(WIDTH_BASS_DB / (1 + (hz / WIDTH_BASS_HZ) ** 2))
    scatter = irfft(narrow_bass * 1j * np.sign(rng.standard_normal(len(hz))))
    side = signal.oaconvolve(pair.mean(0), np.roll(scatter, size // 2 - 1), "same")
    side = side * amp(curves(WIDTH)[0])
    return pair + np.array([side, -side])


def scene():
    """The balloon, then a hard cut to the water pistol."""
    second = after(CUT_S, 0.0017)
    balloon = clogged(petrol() + water() + wet_tyre())
    pistol = crack_dips() * (diesel() + grinding()) + chinks() + toy() + creaks()
    return widened((1 - second) * balloon + second * pistol, size=256)


def record(dry):
    """The recorder's band limit, a steep low-pass."""
    lowpass = signal.firwin(511, EDGE_HZ, window=("kaiser", 9), fs=SR)
    return signal.oaconvolve(dry, lowpass[None], "same")


dry = scene()
out = record(dry)
unload_wav(out)
```